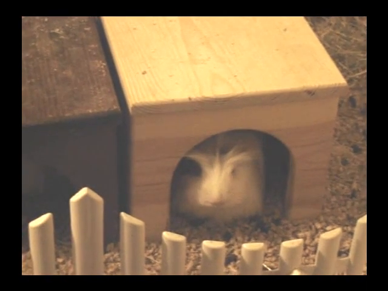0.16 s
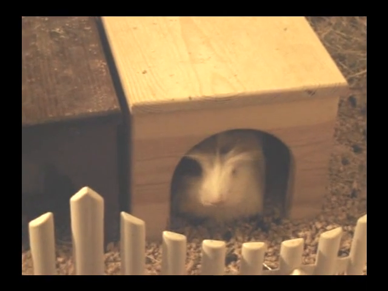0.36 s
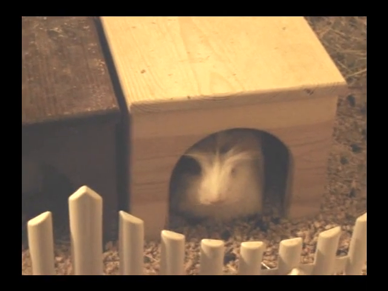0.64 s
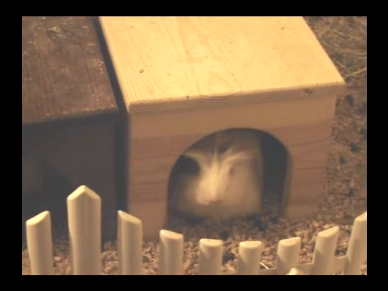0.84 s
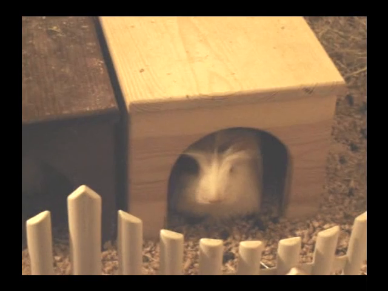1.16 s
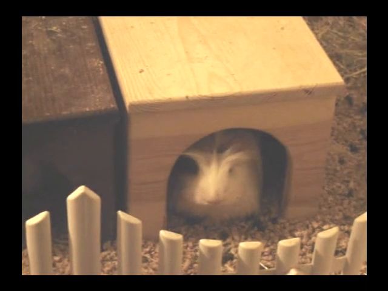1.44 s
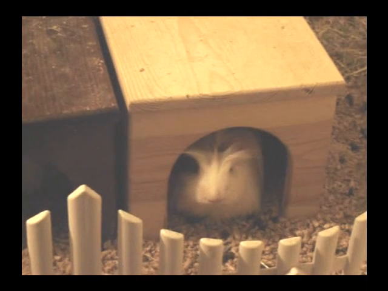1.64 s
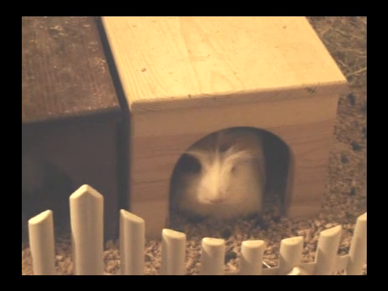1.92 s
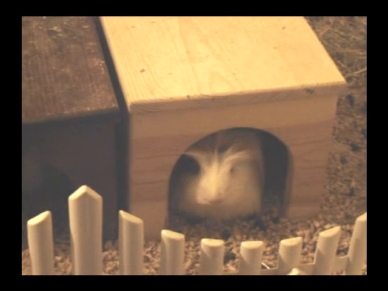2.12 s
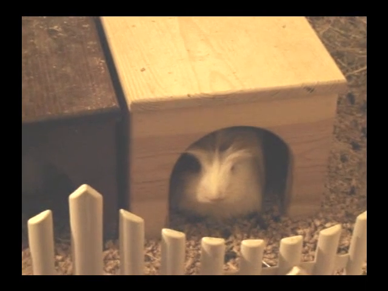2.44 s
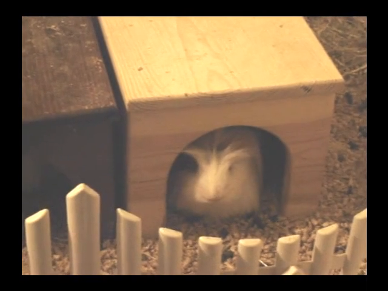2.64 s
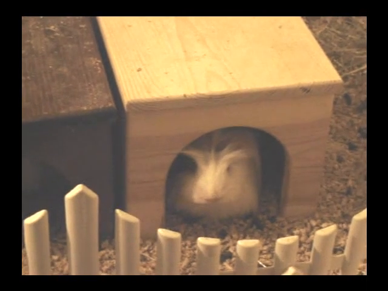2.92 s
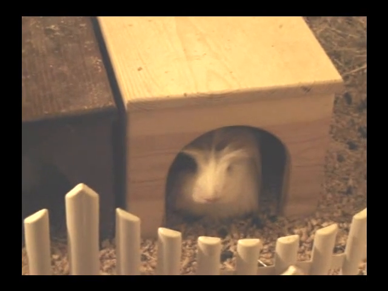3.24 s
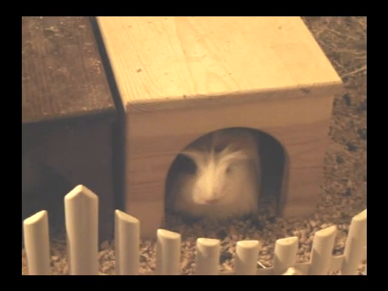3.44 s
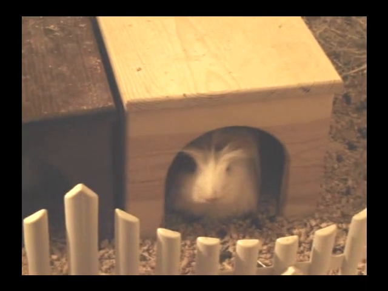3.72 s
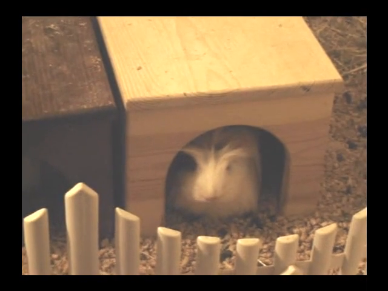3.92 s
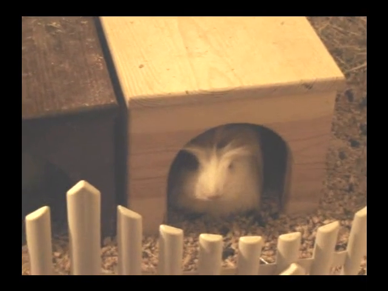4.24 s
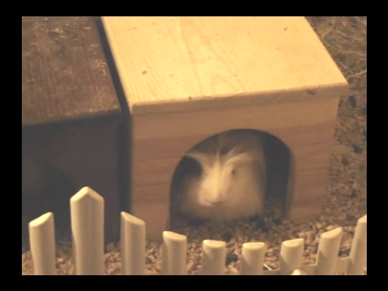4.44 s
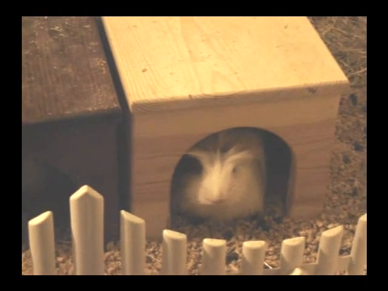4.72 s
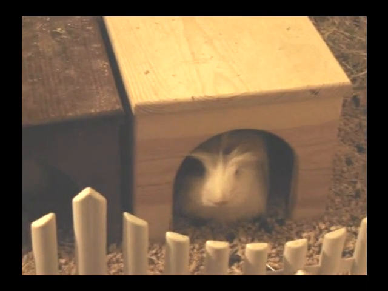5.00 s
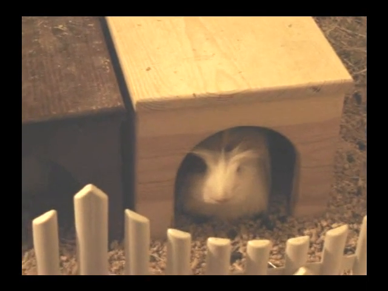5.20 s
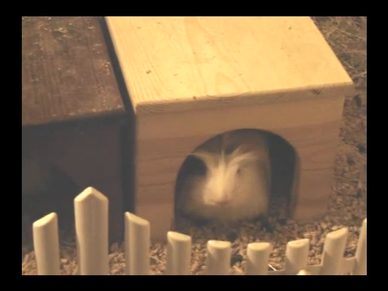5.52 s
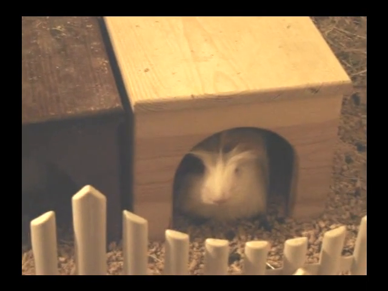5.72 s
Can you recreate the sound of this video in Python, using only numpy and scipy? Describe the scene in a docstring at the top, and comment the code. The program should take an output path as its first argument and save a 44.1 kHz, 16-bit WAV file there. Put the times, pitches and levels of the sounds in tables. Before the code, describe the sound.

Indoors, over constant low ventilation-like rush and faint hum, a small animal utters clipped high whistles, roughly four per second, each dropping in pitch. The first run starts weakly and becomes strong and piercing; after a pause with a few tiny bedding clicks, a second run alternates louder and softer chirps. Short woody reflections follow each call, and a distant rush swells near the end. Almost mono, modest fidelity.

```python
"""A steady rush and wavering hum run throughout; a few tiny ticks in dry bedding fall before and between the chirps.
A guinea pig at the door of its wooden house chirps like a bird in two runs, eight chirps, a pause, then nine.
Each is a falling whistle: a soft rasp, a thin start, a pressed middle rich in overtones, a drop at the end.
The house and a small room return it as dull echoes and a scattered tail; a far rush grows towards the end."""
import sys
import numpy as np
from scipy import signal
from scipy.fft import rfft, irfft
from scipy.io import wavfile

SR = 44100
rng = np.random.default_rng(int(sys.argv[2]) if len(sys.argv) > 2 else 0)


def transcribe(u):
    """Save the signal u as a 16-bit wav file named by the first command-line argument.

    u: samples, shape (n,) or (channels, n), limited to [-1, 1]; the rate is SR.
    q: integer samples, one column per channel.
    """
    v = np.clip(np.atleast_2d(u).T, -1, 1)
    q = np.round(v * 32767).astype(np.int16)
    wavfile.write(sys.argv[1], SR, q)


N = 258688


def amp(db):
    """Decibels to gain."""
    return 10 ** (np.asarray(db) / 20)


def unit(x):
    """Scales to rms 1."""
    return x / np.sqrt(np.mean(x ** 2) + 1e-20)


def read(points, hz):
    """Reads a (frequency, value) table on a log-frequency axis."""
    f, value = np.transpose(points)
    return np.interp(np.log(hz + 1), np.log(f + 1), value)


def add(mix, start_s, sound):
    """Mixes a sound in at start_s."""
    part = mix[round(start_s * SR):][:len(sound)]
    part += sound[:len(part)]


def filtered(x, colour):
    """Applies a zero-phase (frequency, dB) colour."""
    hz = np.fft.rfftfreq(len(x), 1 / SR)
    return irfft(rfft(x) * amp(read(colour, hz)), len(x))


def noise(colour):
    """Steady noise of a given spectrum, rms 1."""
    return unit(filtered(rng.standard_normal(N), colour))


def drift(rate_hz):
    """Slow random signal, rms 1, mostly below rate_hz."""
    hz = np.fft.rfftfreq(N, 1 / SR)
    return unit(irfft(rfft(rng.standard_normal(N)) / (1 + (hz / rate_hz) ** 4), N))


def step(t, at_s, width_s):
    """A smooth rise from 0 to 1, centred on at_s."""
    return .5 + .5 * np.tanh((t - at_s) / width_s)


def rush(level_db=-39.82, swell_db=0.34):
    """Even rush of air: coloured noise with a slight slow swell."""
    # relative density: (frequency [Hz], level [dB per Hz])
    rush_colour = [(15, -45), (25, -31), (48, -5.5), (93, -8.5), (129, -4.5), (194, -1), (269, -1),
                   (321, -4), (519, -2.5), (574, -5), (635, -4), (1320, -9), (2490, -22), (9020, -30.5),
                   (10500, -41.5), (13600, -80), (22000, -120)]
    return amp(level_db + swell_db * drift(0.87)) * noise(rush_colour)


def far_rush():
    """Far rush: mostly low noise under a level curve that grows towards the end."""
    # (time [s], level [dB])
    far_level = [(0, -49.5), (1.501, -49.5), (2.703, -48), (4.502, -46), (5.0, -42), (5.45, -40),
                 (5.87, -42.5)]
    # (frequency [Hz], relative level [dB])
    far_colour = [(100, -14), (300, -2.5), (500, -11), (900, -8.5), (1210, -7.5), (1500, -11.5),
                  (2500, -19.5), (8000, -36.5)]
    time_s, level_db = np.transpose(far_level)
    return amp(np.interp(np.arange(N) / SR, time_s, level_db)) * noise(far_colour)


def hum():
    """Motor hum and faint room drones: sines wavering in pitch and, by 1 dB rms, in level."""
    # (mean frequency [Hz], mean level [dB rms], wander [Hz rms])
    partials = [(72.2, -53.5, 1.2), (145, -46, 0.98), (263.7, -50.5, 6.15), (288.2, -51.5, 1.73),
                (368, -52, 9.2), (520.7, -55, 3.99), (725, -59.5, 3.96)]
    out = np.zeros(N)
    for mean_hz, level_db, wander_hz in partials:
        level = np.sqrt(2) * amp(level_db + drift(5.9))
        hz = mean_hz + wander_hz * drift(5.06)
        out += level * np.sin(2 * np.pi * np.cumsum(hz) / SR)
    return out


def bedding(decay_s=0.0022):
    """Dry chips snap: very short, exponentially decaying noise bursts."""
    # (time [s], onset level [dB])
    ticks = [(.195, -35), (0.731, -41), (.769, -40.5), (2.510, -44), (2.948, -38), (3.2, -31.5),
             (3.231, -38)]
    # (frequency [Hz], relative level [dB])
    tick_colour = [(1200, -27), (2500, -3), (3700, 6), (5200, -2), (7300, -0.5), (11000, -15)]
    out, burst = np.zeros(N), noise(tick_colour)
    t = np.arange(SR // 50) / SR
    for start_s, level_db in ticks:
        snap = burst[round(start_s * SR):][:len(t)] * np.exp(-t / decay_s)
        add(out, start_s, amp(level_db) * snap)
    return out


def chirp(row, tremor, flutter, breathy=0.25, onset_rough=0.27, thin_db=-21, slack_db=-6,
          fourth_db=-18, press_width_s=0.0011, release_width_s=0.0032, lag_s=0.0022,
          attack_s=0.0014, settle=2.6, arch_db=3.0):
    """Falling whistle; overtones switch on, lowest first, while the folds are pressed together."""
    # path out of the house favours some pitches: (frequency [Hz], gain [dB])
    house = [(1400, 3.5), (2100, -1.5), (2300, -1.5), (2440, 2), (2550, -3), (2680, 9), (3000, 9.5),
             (4300, -2.5), (5100, 2.5), (6000, 10), (6800, 2.5), (7450, 0.5), (8300, -4), (9600, 5),
             (10400, -17)]
    # drop against the middle: (end pitch [Hz], level [dB])
    drop_level = [(1400, -14.5), (1950, -13.5), (2130, -1.5), (2480, 11.5)]
    start_s, press, release, press_hz, end_hz, middle_db, second_db, third_db = row
    effort_db = middle_db + 20  # against a full-voiced chirp

    # sharp start, more so with effort and a longer lead-in
    start_hz = press_hz * (1 + 0.068 + .003 * effort_db + 5.97 * press)
    # the pressed part takes the top of the fall, up to a soft limit
    release_hz = press_hz - 457.5 * np.tanh((press_hz - end_hz) / 554)
    # a deeper fall takes longer
    drop_s, drop_s_per_octave = 0.0022, .03
    end = release + drop_s + drop_s_per_octave * abs(np.log2(press_hz / end_hz))
    t = np.arange(int((end + 0.0065) * SR)) / SR
    now = slice(round(start_s * SR), round(start_s * SR) + len(t))

    lead = np.clip(t / press, 0, 1)
    bend = 1.65 * np.exp(0.134 * effort_db)  # 1 is a straight glide; harder pushes fall later
    glide = np.clip((t - press) / (release - press), 0, 1) ** bend
    drop = 1 - (1 - np.clip((t - release) / (end - release), 0, 1)) ** settle  # levels out
    hz = start_hz + (press_hz - start_hz) * lead
    hz += (release_hz - press_hz) * glide + (end_hz - release_hz) * drop
    jitter, shimmer = .005, .04  # rms shares of pitch and level
    phase = 2 * np.pi * np.cumsum(hz * (1 + jitter * tremor[now])) / SR

    pressed, slack = step(t, press, press_width_s), step(t, release, release_width_s)
    start_db = middle_db - 7.5 + 0.04 * effort_db
    drop_db = middle_db + read(drop_level, end_hz)
    level = amp(start_db + (middle_db - start_db) * pressed + (drop_db - middle_db) * slack)
    arch = np.sin(np.pi * np.clip(t / (release + press), 0, 1))
    level *= amp(arch_db * (arch - 1.03))  # the push swells and fades
    level *= np.clip(t / attack_s, 0, 1) * (1 - step(t, end, 0.0062))

    # overtones: rough just after the folds meet, breathier in weak calls
    rough = breathy * amp(-.7 * np.clip(effort_db, -11, 6))
    rough = rough + onset_rough * pressed * np.exp(-abs(t - press) / 0.011)
    # the fundamental dips by up to 2 dB as the folds meet
    squeeze_db = -2 * pressed * np.exp(-abs(t - press) / 0.014)
    voice = amp(read(house, hz) + squeeze_db) * np.sin(phase) * (1 + shimmer * flutter[now])
    for k, db in enumerate([second_db, third_db, third_db + fourth_db]):
        harmonic = k + 2
        opened = step(t, press + k * lag_s, press_width_s + k * lag_s / 2)
        overtone_db = db + thin_db * (1 - opened) + slack_db * (2 * k + .5) * slack
        gain = amp(overtone_db + read(house, harmonic * hz))
        voice += gain * np.sin(harmonic * phase) * (1 + rough * flutter[now])
    return np.sqrt(2) * level * voice


def guinea_pig(rasp_lead_s=.017, rasp_s=0.0093):
    """Chirps, each led by a soft noise rasp as the mouth opens."""
    # one row a chirp: (start [s], delay to press [s], delay to release [s], pressed pitch [Hz], end pitch [Hz],
    # nominal middle level [dB], second harmonic [dB], third harmonic [dB], rasp level [dB]);
    # harmonics are against the fundamental, ahead of the house gain
    chirps = [ (.303, 0.0033, 0.023, 2230, 1980, -29, -16.5, -36, -59),
              (.540, 0.0072, 0.028, 2250, 2000, -35.5, -23, -38, -48),
              (0.981, 0.0085, 0.042, 2540, 2150, -19, -2, -11, -45),
              (1.256, 0.0025, 0.038, 2594, 2158, -21, 4.5, -4, -49),
              (1.516, 0.0059, 0.039, 2546, 2140, -18, 1, -6, -47),
              (1.785, 0.004, 0.027, 2572, 1674, -19.5, 1, -11.5, -46),
              (2.018, 0.0041, 0.033, 2565, 2108, -17.5, 0.5, -5.5, -42),
              (2.271, 0.0045, 0.026, 2545, 1713, -18, -1, -7.5, -58),
              (3.265, .006, 0.022, 2710, 2560, -33.5, -21, -8.5, -51),
              (3.463, 0.0058, 0.029, 2648, 1656, -20, -3, -1.5, -52),
              (3.7, 0.0084, 0.03, 2542, 1990, -25, -4.5, -6, -54),
              (3.936, 0.0045, .027, 2640, 1740, -22, -3.5, 0.5, -54),
              (4.148, 0.0058, 0.03, 2777, 2200, -33, -7, -17, -59),
              (4.385, 0.0064, 0.021, 2564, 1556, -19.5, 0, 0, -53),
              (4.616, 0.0034, 0.02, 2740, 2220, -33.5, -10, -7, -40.5),
              (4.869, 0.0068, 0.032, 2598, 1810, -21.5, 1.5, -1.5, -43),
              (5.099, .015, .031, 2596, 1409, -19, -1.5, 0, -45), ]
    # (frequency [Hz], relative level [dB])
    rasp_colour = [(1500, -30), (2800, -1), (3700, 10), (4600, 0.5), (6000, -10), (8000, -5), (11000, -25)]
    out, tremor, flutter = np.zeros(N), drift(350), drift(516)
    air = noise(rasp_colour)
    puff = signal.windows.tukey(int(rasp_s * SR), .5)
    for *row, rasp_db in chirps:
        start_s = row[0]
        add(out, start_s, chirp(row, tremor, flutter))
        rasp = air[round(start_s * SR):][:len(puff)] * puff
        add(out, start_s - rasp_lead_s, amp(rasp_db) * rasp)
    return out


def room(x, taps_per_s=1200):
    """Dull single echoes, then scattered reflections that die by band."""
    # boards, floor and walls: (delay [s], gain ahead of echo_colour)
    echoes = [(.00449, 0.14), (0.0095, 0.43), (0.0141, 0.15), (0.0155, .14), (0.0211, 0.37),
              (0.0252, 0.096), (0.026, 0.12), (.03302, 0.15), (0.0401, 0.12), (0.0582, 0.13)]
    # wood and bedding swallow the treble: (frequency [Hz], gain [dB])
    echo_colour = [(2500, 3.5), (5000, -11.5), (7000, -16.5), (10000, -10.5)]
    # (frequency [Hz], t60 [s])
    tail_t60 = [(1500, 0.12), (2500, 0.33), (5000, 0.31), (10000, 0.15)]
    # treble is beamed away and returns later: (frequency [Hz], delay [s])
    tail_delay = [(2500, 0.017), (5000, 0.013), (7400, 0.03)]
    # (frequency [Hz], tail level [dB])
    tail_colour = [(1600, -7.5), (2500, -4), (5000, -11), (7400, -14), (10000, -10.5)]
    draw, size = rng.random(SR // 2), rng.standard_normal(SR // 2)
    scatter = unit(np.sign(size) * (draw < taps_per_s / SR))
    hz, t, bands = signal.stft(scatter, SR, nperseg=256)
    shape = amp(-60 * t / read(tail_t60, hz)[:, None])
    shape *= step(t, read(tail_delay, hz)[:, None], 0.0017)
    energy = np.mean(shape ** 2, axis=1, keepdims=True) * SR / 2
    shape *= amp(read(tail_colour, hz))[:, None] / np.sqrt(energy)
    tail = signal.istft(bands * shape, SR, nperseg=256)[1]
    taps = np.zeros(len(tail))
    for delay_s, gain in echoes:
        taps[round(delay_s * SR)] += gain
    return signal.fftconvolve(x, filtered(taps, echo_colour) + tail)[:N]


def scene():
    """Nearly mono; a quarter-cycle-shifted side signal leads left against right, mostly in the treble."""
    # (frequency [Hz], side against middle [dB])
    width = [(100, -49.5), (1000, -49), (2500, -47), (5000, -34.5), (7500, -34), (10000, -25.5)]
    near = guinea_pig() + bedding()
    middle = near + room(near) + rush() + far_rush() + hum()
    side = irfft(1j * rfft(middle) * amp(read(width, np.fft.rfftfreq(N, 1 / SR))), N)
    return np.array([middle + side, middle - side])


def record(dry, edge_hz=10450):
    """The recorder's band limit: a linear-phase low-pass."""
    lowpass = signal.firwin(161, edge_hz, window=("kaiser", 8), fs=SR)
    return signal.oaconvolve(dry, lowpass[None], "same")


dry = scene()
out = record(dry)
transcribe(out)
```